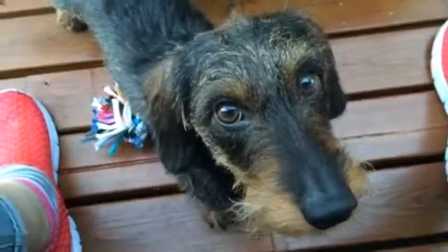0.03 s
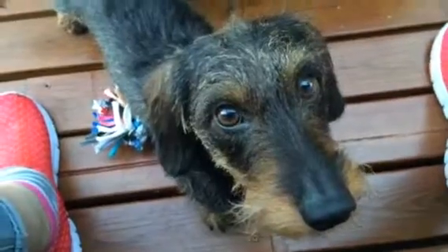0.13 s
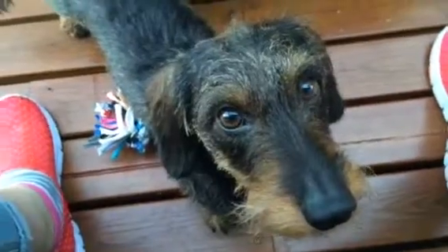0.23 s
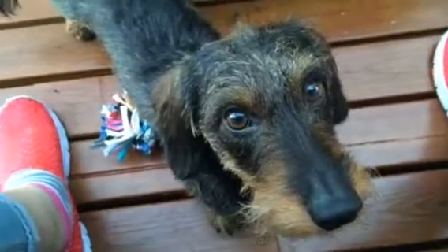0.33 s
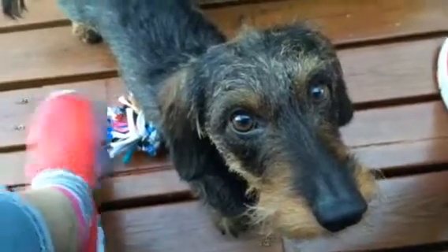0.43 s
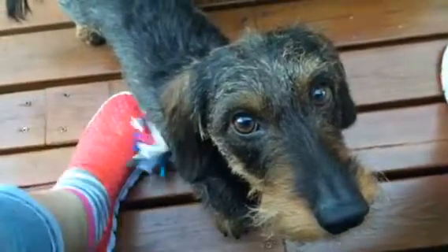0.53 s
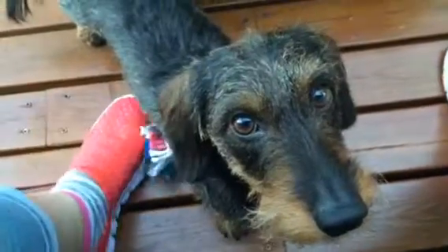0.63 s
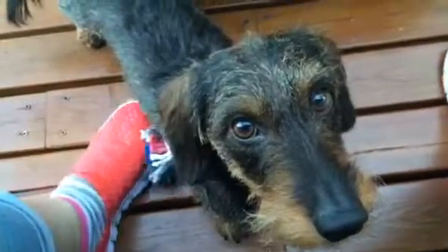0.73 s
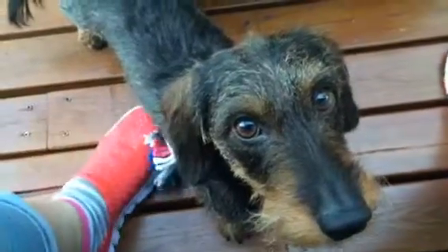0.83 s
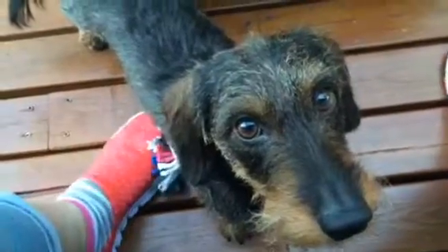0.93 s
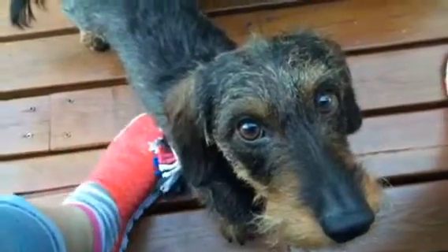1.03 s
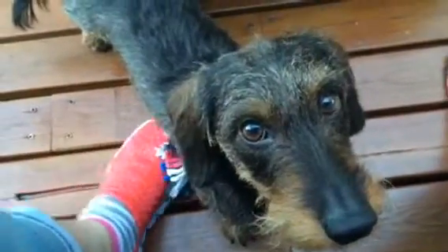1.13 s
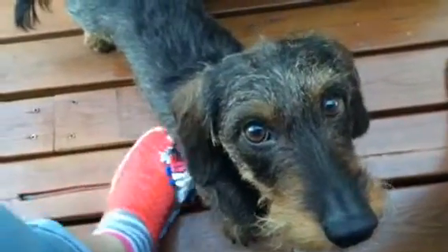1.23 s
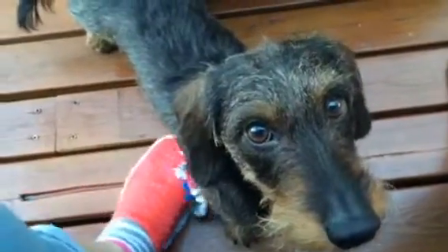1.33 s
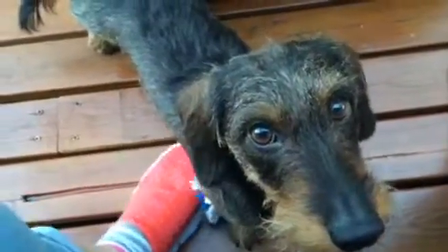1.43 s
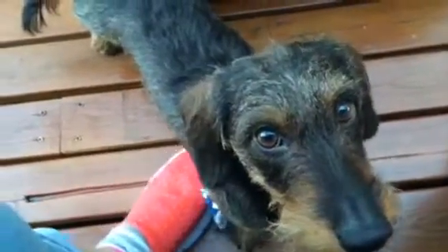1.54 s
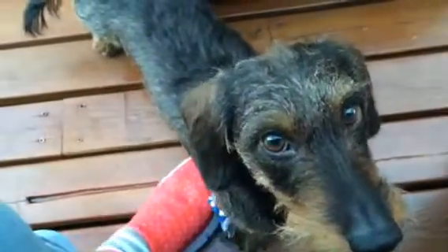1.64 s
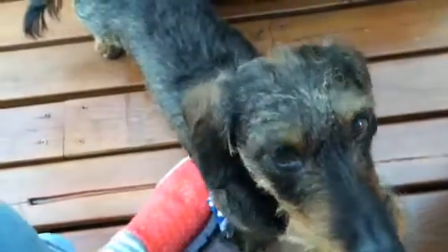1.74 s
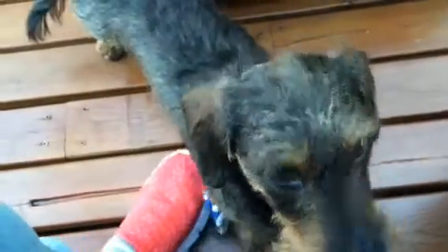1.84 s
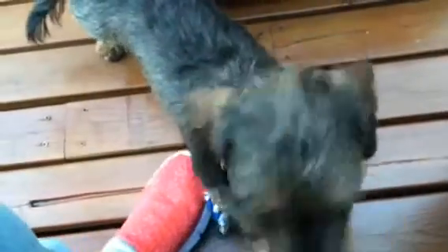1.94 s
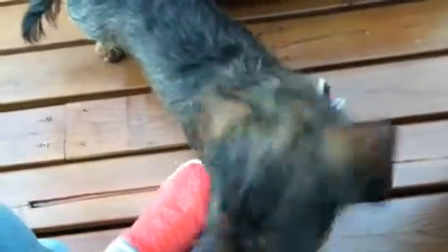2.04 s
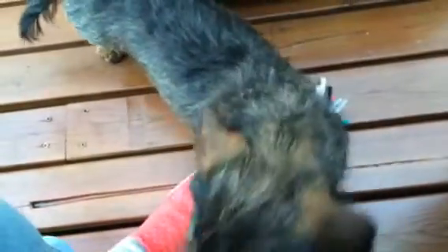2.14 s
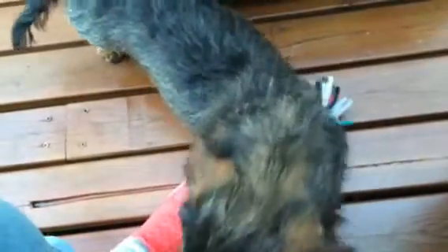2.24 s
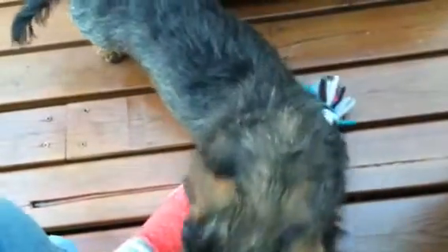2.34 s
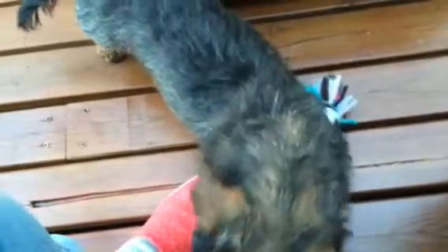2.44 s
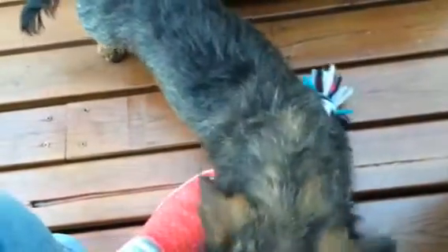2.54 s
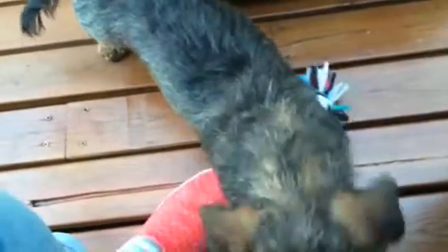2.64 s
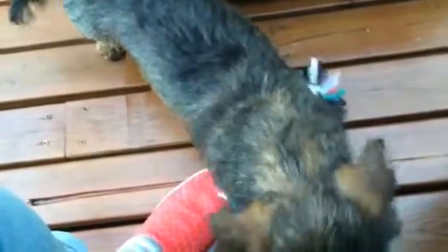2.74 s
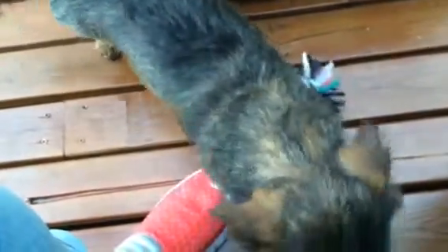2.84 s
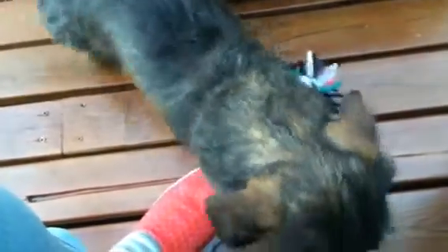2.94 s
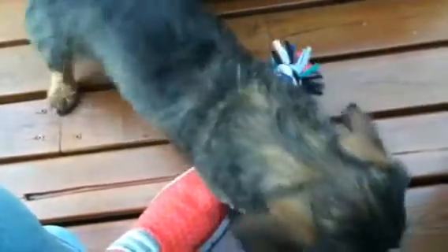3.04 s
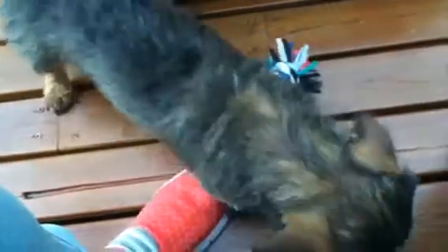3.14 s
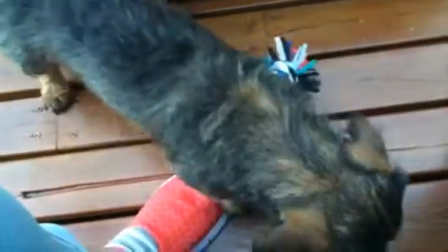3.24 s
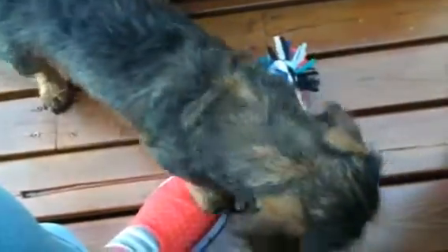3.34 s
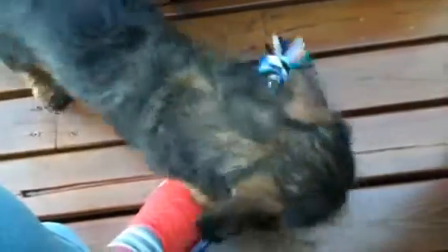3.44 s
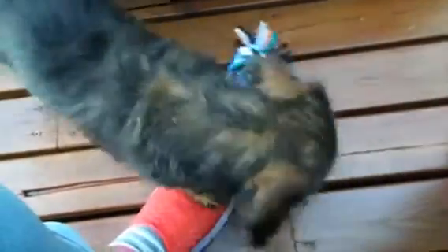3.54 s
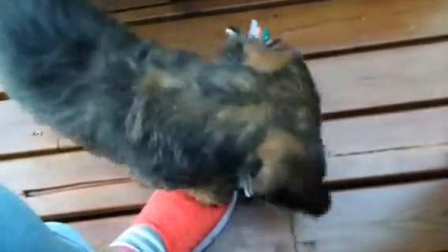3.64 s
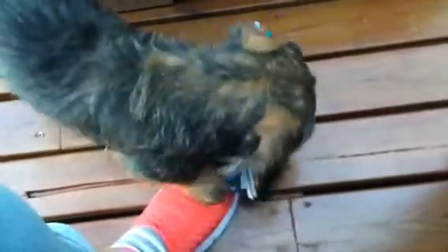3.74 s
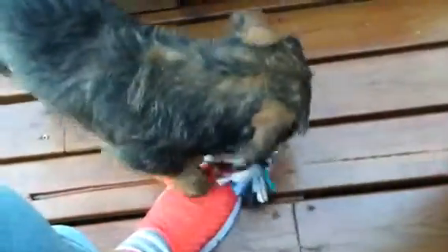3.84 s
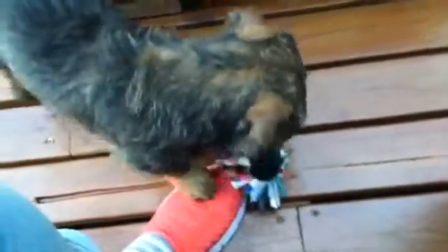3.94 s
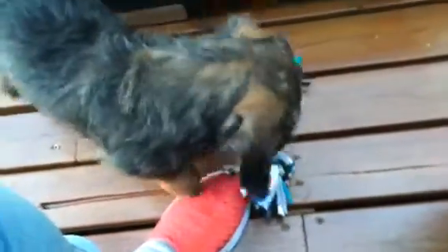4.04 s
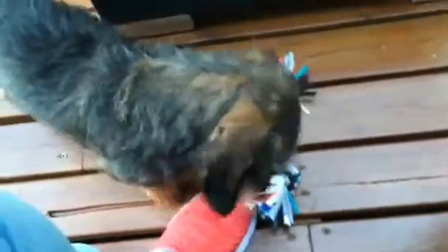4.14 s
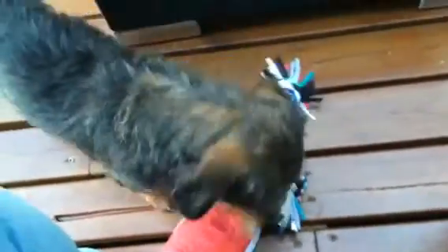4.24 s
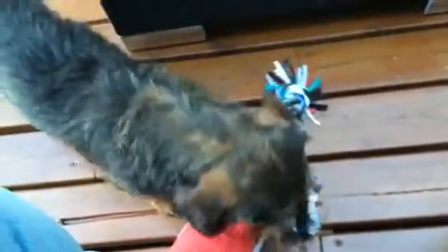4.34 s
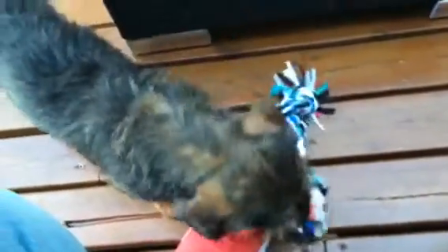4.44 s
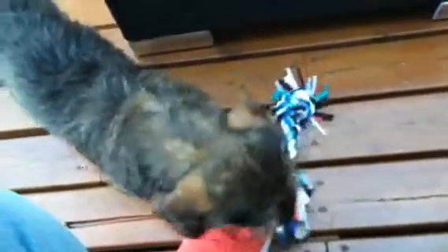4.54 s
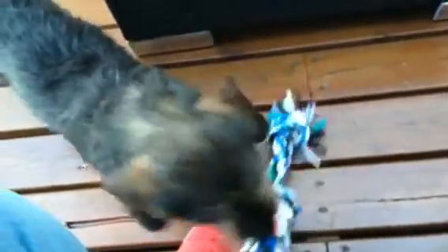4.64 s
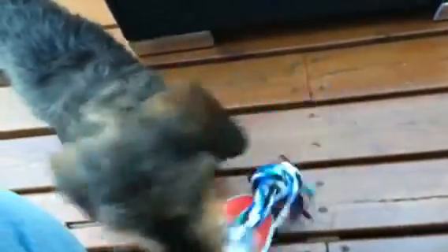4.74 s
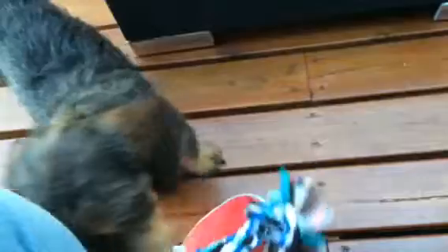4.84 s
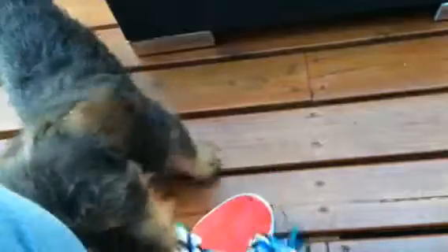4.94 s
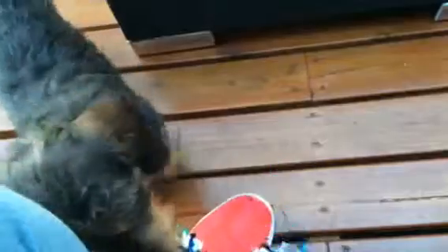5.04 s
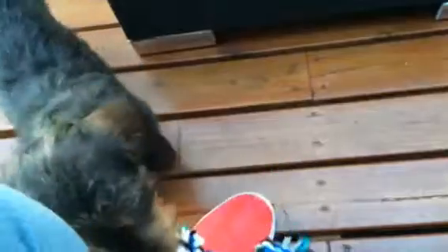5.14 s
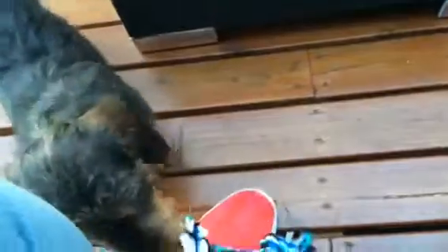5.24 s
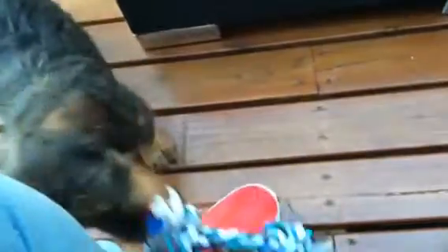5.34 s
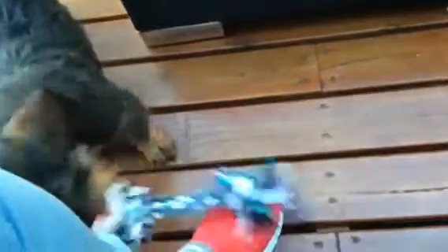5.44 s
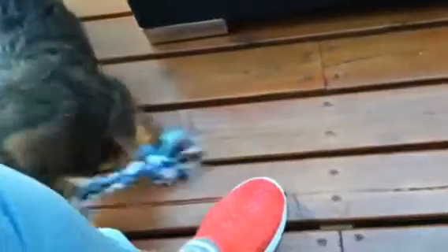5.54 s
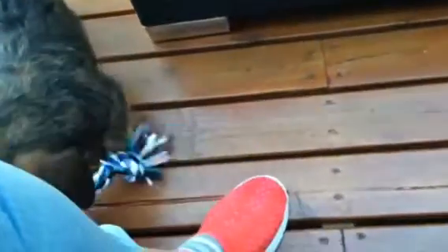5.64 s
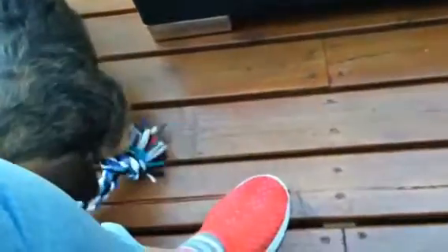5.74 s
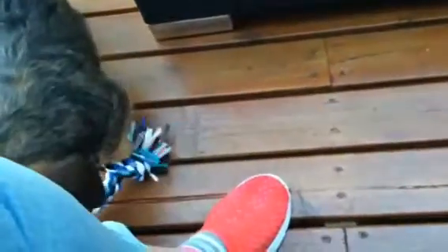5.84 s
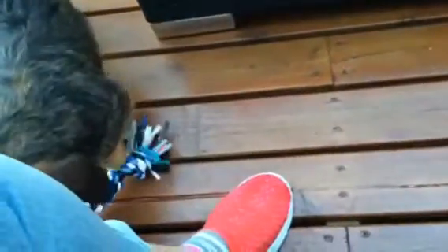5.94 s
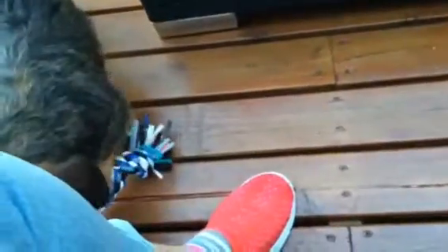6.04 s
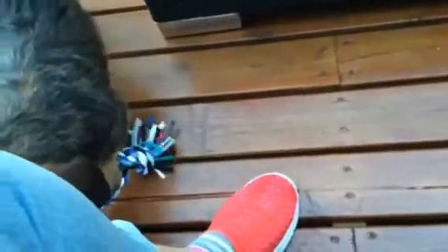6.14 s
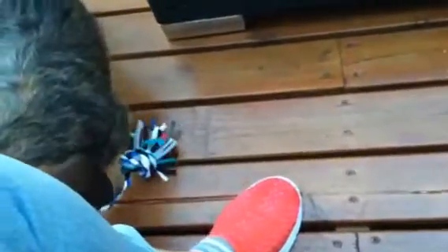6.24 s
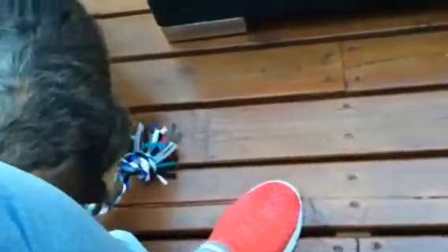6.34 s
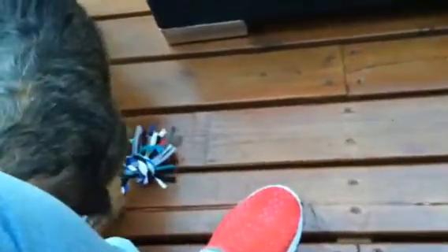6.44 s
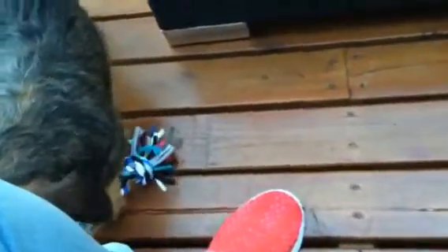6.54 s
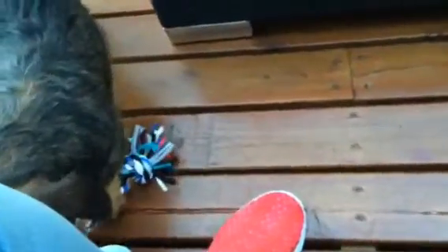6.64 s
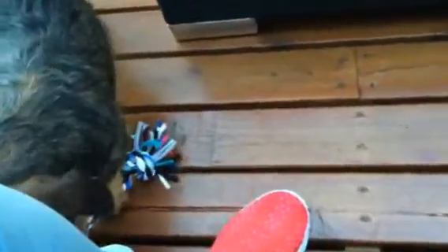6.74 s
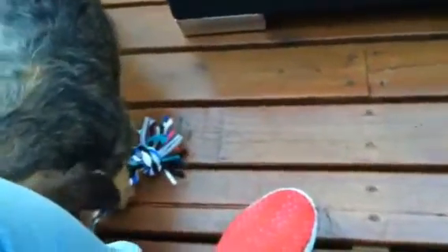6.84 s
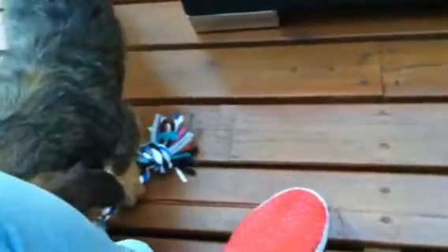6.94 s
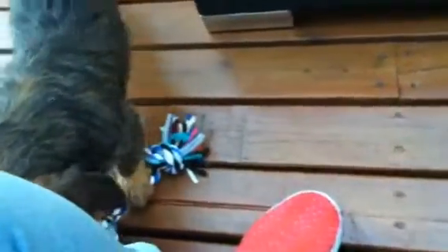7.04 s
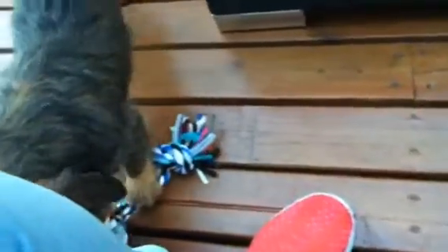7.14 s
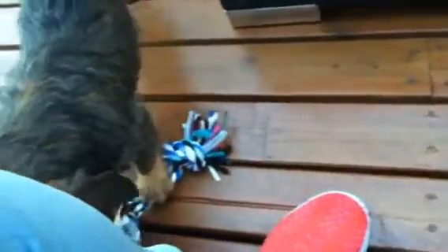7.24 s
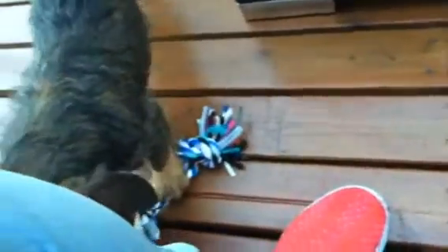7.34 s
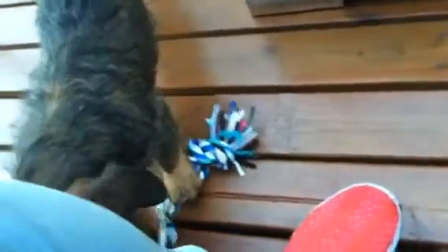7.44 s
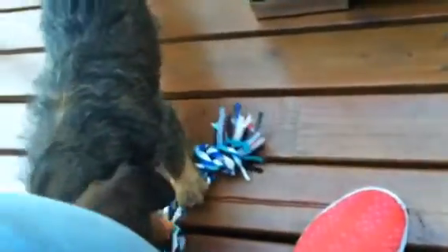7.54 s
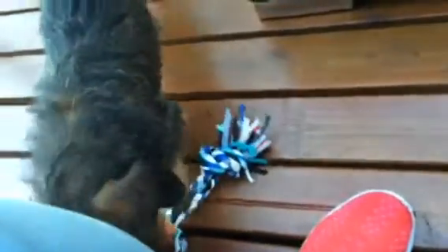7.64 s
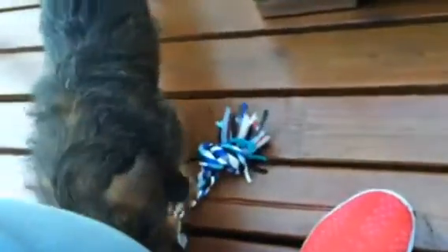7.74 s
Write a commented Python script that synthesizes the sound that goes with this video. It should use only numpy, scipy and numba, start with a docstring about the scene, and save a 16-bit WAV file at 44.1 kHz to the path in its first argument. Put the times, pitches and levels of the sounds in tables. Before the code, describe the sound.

Soft shoe scuffs, sharp claw ticks and rope rustle on deck boards, one heavy woody thump, then quiet chewing and two tiny low dog grunts.

```python
"""Distant traffic hums; shoe, paws and rope scuff a hollow wooden deck, heard by a phone held just above.
A dog plays with a knotted rope: the knot thumps the deck, claws click and drag, the dog grunts and chews.
Noise bands make the traffic and the stir of bodies; filtered friction noise makes scuffs and rustle.
Decaying deck modes make the thumps, short noise bursts the clicks and paw knocks.
Random slips make the dragged claw, uneven pulses through resonances the grunts."""
import sys
import numpy as np
from scipy import signal
from scipy.io import wavfile
from scipy.ndimage import uniform_filter1d
from numba import njit

SR = 44100
rng = np.random.default_rng(int(sys.argv[2]) if len(sys.argv) > 2 else 0)


def generate_wav(sig):
    """Save sig (samples, or channels by samples) to the path in sys.argv[1] as 16-bit PCM at SR."""
    pcm = np.round(np.clip(np.atleast_2d(sig).T, -1, 1) * 32767).astype(np.int16)
    wavfile.write(sys.argv[1], SR, pcm)


N = 343341

# faint rustle of fur and rope, louder once the dog chews: start_s [s], level_db [dB]
RUSTLE_LEVEL = [(0, -94), (.3, -79), (2.3, -83), (3.3, -83), (4.5, -81.5), (5.3, -77.5), (6.27, -82),
                (6.61, -71), (7.12, -68), (7.4, -69.5), (7.79, -73)]


def undb(db):
    """Decibels to gain."""
    return 10 ** (np.asarray(db, float) / 20)


def unit(x):
    """Scaled to rms 1."""
    return x / np.sqrt(np.mean(x ** 2))


def curves(table):
    """Columns of a table joined by straight lines in time."""
    s, *columns = np.transpose(table)
    return [np.interp(np.arange(N) / SR, s, c) for c in columns]


def band(x, hz, width_hz):
    """Resonance with gain 1 at its centre."""
    b, a = signal.iirpeak(min(hz, .45 * SR), hz / width_hz, fs=SR)
    return signal.lfilter(b, a, x)


def twice(x, hz, width_hz):
    """Resonance applied twice for steep skirts."""
    return band(band(x, hz, width_hz), hz, width_hz)


def body(x, peaks):
    """Sum of steep resonances, given as (Hz, width Hz, dB); rms 1."""
    return unit(sum(undb(db) * twice(x, hz, width_hz) for hz, width_hz, db in peaks))


def walk(rate):
    """Random levels held 1 / rate s and slewed twice; spread near 1."""
    hold = int(SR / rate)
    steps = np.repeat(rng.standard_normal(N // hold + 1), hold)
    return 1.35 * uniform_filter1d(uniform_filter1d(steps, hold), hold)[:N]


def grit(rate, spread_db):
    """Tiny slips at random moments, a few much larger than the rest."""
    hits = rng.random(N) < rate / SR
    return hits * rng.standard_normal(N) * undb(spread_db * rng.exponential(size=N))


def slips():
    """Dense friction noise with a little grit."""
    return 0.77 * unit(grit(9000, 1.1)) + rng.standard_normal(N)


def plank(x, plain):
    """The planks lift their small resonances above a plain share of the sound."""
    # plank resonances: pitch_hz [Hz], width_hz [Hz], level_db [dB]
    plank_peaks = [(1470, 69, -8), (1763, 110, -4), (2384, 120, -6.5), (2780, 43, -3.5), (3135, 72, -6.5),
                   (3660, 59, -17), (4090, 89, -8), (5070, 180, -10)]
    return plain * x + sum(undb(db) * band(x, hz, width_hz) for hz, width_hz, db in plank_peaks)


def add(out, s, sound):
    """Mixes a sound in at time s."""
    i = int(s * SR)
    out[i:i + len(sound)] += sound[:N - i]


def town():
    """Narrow noise bands of far traffic that swell together very slightly and flicker alone."""
    # spectrum of the hum before its overall level is set: pitch_hz [Hz], density_db [dB per Hz]
    traffic_spectrum = [(15, -49), (25, -3), (75, -2.5), (129, -7.5), (198, -4), (456, -9.5), (495, -10.5),
                        (536, -16.5), (1140, -8), (2480, -28), (2920, -52), (3430, -29.5), (15500, -31)]
    out, swell = 0, walk(0.88)
    f, density_db = np.transpose(traffic_spectrum)
    for hz in 30 * 2 ** (.4 * np.arange(23)):
        # a band's level is its density plus its width
        db = np.interp(np.log(hz), np.log(f), density_db) + 10 * np.log10(hz)
        db = db + 0.18 * swell + 0.92 * walk(7.3)
        out = out + undb(db) * unit(twice(rng.standard_normal(N), hz, hz / 3))
    return unit(out) * undb(-67)


def stir():
    """Bodies on the deck and air on the phone: faint random forces keep the low modes murmuring."""
    # strength of the stir: start_s [s], level_db [dB]
    stir_level = [(0, -73), (.73, -68.5), (.97, -75), (1.26, -64), (1.5, -75), (2.47, -74.5), (3.4, -69),
                  (4.12, -69.5), (4.4, -75), (4.99, -65.5), (5.3, -72), (5.77, -60), (5.9, -76),
                  (6.09, -66.5), (6.4, -71), (7.07, -74.5), (7.48, -67.5), (7.62, -72)]
    force = rng.standard_normal(N) * undb(3 * walk(12))
    murmur = body(force, [(57.6, 57, 2.0), (113.0, 89, 0), (204.0, 108, -3.0), (338, 300, -5.5)])
    return murmur * undb(curves(stir_level)[0])


def rope():
    """Cotton strands slide over each other and lend the rustle a few fixed colours."""
    # resonances of the chewed rope: pitch_hz [Hz], width_hz [Hz], level_db [dB]
    strand_peaks = [(2190, 660, 1), (3560, 830, -2.5), (6240, 2300, -3.5)]
    level_db = curves(RUSTLE_LEVEL)[0] - 5.5 + 1.2 * walk(15)
    return body(slips(), strand_peaks) * undb(level_db)


def rubbing():
    """Gains of mids, treble and low mids, and the centre: scuffs swell over the rustle, powers add."""
    # scuffs of shoe, paws and rope: peak_s [s], level_db [dB], rise_s [s], fall_s [s],
    # centre_hz [Hz], treble_db [dB over level_db], low_mids_db [dB over level_db]
    scuff_list = [(.54, -54, 0.13, 0.13, 3650, -5.5, -5.5), (.65, -72.5, .04, 0.13, 3300, 0.5, -7),
                  (.94, -74, 0.071, 0.055, 3200, -2, 4.5), (1.16, -61.5, 0.083, 0.17, 3350, -11, 1.5),
                  (1.275, -53.5, 0.14, 0.17, 2500, -7, -4.5), (1.51, -75.5, 0.3, 0.11, 2530, -2, 9),
                  (1.68, -79.5, 0.15, 0.15, 2260, 0, 9), (1.916, -68, 0.12, 0.11, 4030, -4.5, -1.5),
                  (2.12, -76, .25, .2, 2630, -5, -0.5), (2.535, -80, 0.042, .08, 2700, -8, 8.5),
                  (2.77, -82, 0.052, .2, 2510, -12, 5), (2.92, -79.5, 0.09, .1, 3100, 3.5, -10),
                  (3.013, -71.5, 0.067, 0.14, 2690, -0.5, 6), (3.43, -76.5, 0.17, 0.12, 3050, 7.5, 9.5),
                  (3.57, -74.5, .2, 0.13, 3500, 2.5, -8), (3.65, -65, 0.092, 0.023, 2840, -1.5, -9),
                  (3.743, -63.5, 0.072, 0.13, 2980, -9, -1), (3.87, -68.5, 0.072, 0.13, 2770, 8, 6),
                  (4.071, -61, 0.044, 0.07, 2870, -10, -18), (4.283, -68.5, 0.1, 0.16, 2880, -9, -5),
                  (4.8, -74.5, 0.064, 0.19, 3100, -2, 3), (5.216, -72, .1, 0.1, 2600, -19, -1),
                  (5.39, -61.5, 0.022, 0.13, 2700, -16, -4), (5.475, -64, 0.15, 0.041, 2450, -2, 1),
                  (5.567, -68.5, 0.082, .07, 3060, -5, 1), (5.675, -74, .1, 0.14, 2420, -1, -4),
                  (6.07, -68, 0.12, 0.13, 2340, -5, -6)]
    drop_db = 24.5  # lost over the rise or fall time
    rise_round, fall_round = 1.86, 1.3  # 1 = pointed peak, more = flatter top and steeper edge
    rustle_hz, rustle_treble_db, rustle_low_db = 3250, -8, -1

    t = np.arange(N) / SR
    mid = undb(curves(RUSTLE_LEVEL)[0]) ** 2
    high, low = mid * undb(rustle_treble_db) ** 2, mid * undb(rustle_low_db) ** 2
    weighted_hz = mid * rustle_hz
    for s, db, rise, fall, centre_hz, treble_db, low_db in scuff_list:
        before = np.abs((s - t) / max(rise, .005)) ** rise_round
        after = np.abs((t - s) / max(fall, .005)) ** fall_round
        power = undb(db - drop_db * np.where(t < s, before, after)) ** 2
        mid, weighted_hz = mid + power, weighted_hz + power * centre_hz
        high, low = high + power * undb(treble_db) ** 2, low + power * undb(low_db) ** 2
    # the stronger source pulls the centre its way
    return np.sqrt(mid), np.sqrt(high), np.sqrt(low), weighted_hz / mid


@njit
def glide(x, hz, share):
    """Band-pass whose centre moves every sample; width = share of the centre."""
    y, b, l = np.empty(len(x)), 0., 0.
    for i in range(len(x)):
        g = np.tan(np.pi * hz[i] / SR)
        v = (b + g * (x[i] - l)) / (1 + g * (g + share))
        b, l, y[i] = 2 * v - b, l + 2 * g * v, share * v
    return y


def scuff():
    """Slips through broad board colours and a wandering resonance; each region flickers alone."""
    # colours of the rubbed surface in mids, treble and low mids: pitch_hz [Hz], width_hz [Hz], level_db [dB]
    mid_peaks, treble_peaks, low_peaks = [(3600, 7000, 0)], [(7600, 7000, 0), (7800, 1800, -8)], [(1400, 2200, 0)]
    mid_gain, high_gain, low_gain, hz = rubbing()
    hz = hz * 2 ** (.1 * walk(15))
    focus = unit(glide(glide(slips(), hz, .45), hz, .45))
    boards = unit(plank(body(slips(), mid_peaks), 1.0))
    mid = unit(0.77 * focus + boards) * undb(0.52 * walk(30))
    high = body(slips(), treble_peaks) * undb(3.4 * walk(27))
    low = body(slips(), low_peaks) * undb(2.5 * walk(30))
    return mid_gain * mid + high_gain * high + low_gain * low


def blows():
    """A soft push rings the deck; a longer contact dulls it, a resting weight damps it."""
    # blows on the boards: start_s [s], peak_db [dB], contact_ms [ms], tilt_db [dB per octave],
    # ring_share [share of the free deck's ring time]
    blow_list = [(0.636, -43, 4.1, -4.5, 0.5), (1.946, -50.5, 2, -9.5, 0.59), (2.811, -60.5, 2.5, -2, 0.88),
                 (2.98, -58, 1, 11, 1), (3.839, -54.5, 3, 24, 0.87), (4.813, -39, 2.6, -7, 0.73),
                 (5.014, -61, 1, 5, 0.61), (5.643, -19, 2.16, 3.5, 0.91), (6.022, -65, 2.2, 1, 0.57),
                 (6.658, -55.5, 2.9, 8, 1), (7.29, -55, 2.1, 19, 1)]
    # modes of the free deck: pitch_hz [Hz], level_db [dB], t60_s [s]
    deck_modes = [(76.4, -10, 0.54), (126, -4.5, 0.35), (174, -22, 0.57), (179.7, -5.5, 0.57),
                  (198.3, 5, 0.32), (220.4, 3.5, 0.23), (255.4, -5.5, 0.44), (264.2, 2, 0.25),
                  (327.7, 3, 0.14), (342.2, -3, 0.29), (372, 4.5, 0.13), (407, -6.5, 0.29),
                  (424.3, 0, 0.15), (487, -12, 0.29), (505, -11, 0.075), (515, -12.5, 0.21), (570, -20, .1),
                  (606, -19, 0.27), (633, -22, .1)]
    out, t = np.zeros(N), np.arange(SR // 2) / SR
    for s, db, contact_ms, tilt_db, ring_share in blow_list:
        ring = 0
        for hz, mode_db, t60 in deck_modes:
            gain = undb(mode_db + tilt_db * np.log2(hz / 250))
            build = 1 - np.exp(-t * hz / 0.61)  # counted in cycles, so the lows build up last
            decay = np.exp(-np.log(1000) * t / (t60 * ring_share))
            ring = ring + gain * np.sin(2 * np.pi * hz * t) * build * decay
        push = np.hanning(max(int(contact_ms * SR / 1000), 3))
        # slatted boards radiate the bass poorly
        no_bass = signal.butter(2, 110., "high", fs=SR, output="sos")
        sound = signal.sosfilt(no_bass, np.convolve(ring, push))
        add(out, s - .003, -undb(db) * sound / np.abs(sound).max())
    return out


def claws():
    """A hard tip strikes: a short ring, a bright crack and a scattered tail from boards and walls."""
    # clicks before the planks colour them: start_s [s], ring_db [dB], pitch_hz [Hz],
    # treble_db [dB, trim of crack and tail treble], tail_db [dB over the ring], width_share [share of pitch]
    click_list = [(2.0003, -50, 1860, -13, -4, 1), (2.2363, -38.5, 3060, -11, -13.5, 1),
                  (2.2403, -40.5, 1440, -21, -8, .4), (2.278, -47, 1530, -24, -5.5, .63),
                  (2.759, -51.5, 1520, -9, -13, .94), (2.9944, -57, 1470, -1, -9, .65),
                  (3.0286, -39, 2540, -10, -17, 0.44), (3.0937, -51.5, 1530, -26, -2.5, .68),
                  (3.371, -38.5, 1790, -19, -18, 0.31), (3.3982, -53, 1380, -1.5, -9, 0.67),
                  (3.478, -54.5, 5300, -10, -3.5, 0.36), (3.6974, -31, 3680, -26, -13, 0.79),
                  (3.7025, -30, 1710, -8, -16, 1), (3.709, -32, 3200, -22, -11.5, .98),
                  (3.8443, -42.5, 2220, -15, -11, .25), (4.2346, -36.5, 2530, -31, -4, 1),
                  (4.2406, -36, 2420, -3, -27, 0.89), (4.368, -42.5, 6900, -14, -22, 0.16),
                  (4.8, -45, 1750, -1.5, -19, 1), (4.812, -47.5, 1390, -21, -20, 1),
                  (4.8207, -58, 1510, 5, -19, 0.93), (5.021, -60, 1380, -1, -7, 0.41),
                  (5.155, -39.5, 1790, -2.5, -14, .3), (5.158, -47, 3050, -6, -12, .25),
                  (5.17, -41.5, 1810, -8, -5.5, .3), (5.386, -46.5, 5090, 2, -3, .4),
                  (5.403, -34, 2810, -6.5, -9, .49), (5.416, -30.5, 2760, -23, -16, 0.27),
                  (5.629, -28, 2690, -16, -18.5, 0.31), (5.635, -42, 2670, -15, -32, .33),
                  (5.656, -49.5, 2220, 2, -10, 0.48), (5.7037, -51, 2280, -8, -14, .55),
                  (6.05, -45, 2590, -18, -27, .3), (6.084, -33.5, 2710, -15.5, -24, 0.23),
                  (6.0855, -37, 1750, -14, -16, .3), (6.1066, -49, 2770, -20, -19, 0.25),
                  (6.9331, -44, 2770, -18, -16, .4), (6.943, -43.5, 2370, -12, -12, 0.33),
                  (7.396, -49, 3520, -5, -6, .83)]
    out, t = np.zeros(N), np.arange(SR // 5) / SR
    snap = (1 - np.exp(-t / 0.00051)) * np.exp(-t / 0.0019)
    tail_shape = np.exp(-t / 0.014) * (1 - np.exp(-t / 0.0013))
    for s, db, hz, treble_db, tail_db, share in click_list:
        ring_noise, crack_noise, tail_noise = rng.standard_normal((3, len(t)))
        width = np.clip(share, .08, 1.5) * hz
        ring = band(band(ring_noise * snap, hz, width), hz, 2 * width)
        crack = band(band(crack_noise * snap, 6200, 8300), 6500, 8800)
        scatter = twice(tail_noise, hz, 1.6 * hz)
        scatter = scatter + 0.53 * undb(treble_db) * band(tail_noise, 5900, 6700)
        sound = ring / np.abs(ring).max()
        sound = sound + 2.54 * undb(treble_db) * crack / np.abs(crack).max()
        sound = sound + undb(tail_db) * unit(scatter) * tail_shape
        add(out, s - .0003, undb(db) * sound)
    # a claw tip is too light to move the boards' lows
    no_lows = signal.butter(3, 1250., "high", fs=SR, output="sos")
    return plank(signal.sosfilt(no_lows, out), 0.48)


def paws():
    """The paw's weight behind a claw: a short dull knock."""
    # pads knocking the boards: start_s [s], peak_db [dB]
    knock_list = [(2.2404, -59), (2.7583, -59), (3.0285, -58), (3.371, -52), (3.478, -56), (3.6976, -50),
                  (3.7027, -49), (3.7084, -48), (3.8443, -50.5), (4.2346, -50.5), (4.2409, -47),
                  (4.811, -44), (4.822, -56), (5.02, -51), (5.155, -50), (5.416, -53), (5.629, -47),
                  (5.635, -46), (5.657, -46), (5.7037, -74)]
    out, t = np.zeros(N), np.arange(SR // 20) / SR
    for s, db in knock_list:
        knock = twice(rng.standard_normal(len(t)) * np.exp(-t / 0.0044), 760, 940)
        add(out, s, undb(db) * knock / np.abs(knock).max())
    return out


def drag():
    """Stick-slip jerks across the grain ring the board's low mids and stop dead as the claw lifts."""
    # the dragged claw: start_s [s], level_db [dB]
    drag_level = [(4.09, -78), (4.102, -74), (4.134, -56), (4.198, -52), (4.21, -74)]
    t = np.arange(N) / SR
    down = (t > drag_level[0][0]) & (t < 4.199)
    jerks = grit(5000, 1.2) * undb(2.5 * walk(150)) * down
    ring = body(jerks, [(850, 1340, 17.0), (1700, 810, 11), (3400, 1800, -23)])
    # the root brings the rms to about 1 while the claw is down
    return ring * np.sqrt(down.mean()) * undb(curves(drag_level)[0])


def grunts():
    """Slack vocal folds slap unevenly; chest and closed mouth colour each pulse."""
    # low grunts of the dog: start_s [s], length_s [s], rate_hz [mean pulses per s],
    # level_db [dB], brightness_db [dB]
    grunt_list = [(6.165, .13, 77., -63, -12), (7.34, .085, 100., -64, -7)]
    out = np.zeros(N)
    for s, length, rate, db, bright_db in grunt_list:
        timing, strength = rng.standard_normal((40, 2)).T
        when = np.cumsum(1 + 0.15 * timing) / rate
        keep = when < length
        swell = np.sin(np.pi * when[keep] / length) ** 0.21
        pulses = np.zeros(SR // 4)
        pulses[(when[keep] * SR).astype(int)] = undb(2 * strength[keep]) * swell
        voice = body(pulses, [(120, 136, 0), (450, 470, bright_db), (890, 180, bright_db - 1)])
        # the root brings the rms to about 1 over the grunt's own length
        add(out, s, -undb(db) * voice * np.sqrt(4 * length))
    return out


def scene():
    """All sources, heard from one point."""
    background = town() + stir()
    friction = rope() + scuff() + drag()
    strikes = blows() + claws() + paws()
    return (background + friction + strikes + grunts())[None]


def record(dry):
    """The phone drops the deepest bass and cuts the top steeply."""
    dry = signal.lfilter(*signal.butter(2, 38., "high", fs=SR), dry)
    top_cut = signal.ellip(10, .2, 60, 15380, fs=SR, output="sos")  # ripple dB, stop dB, edge Hz
    return signal.sosfilt(top_cut, dry)


dry = scene()
out = record(dry)
generate_wav(out)
```